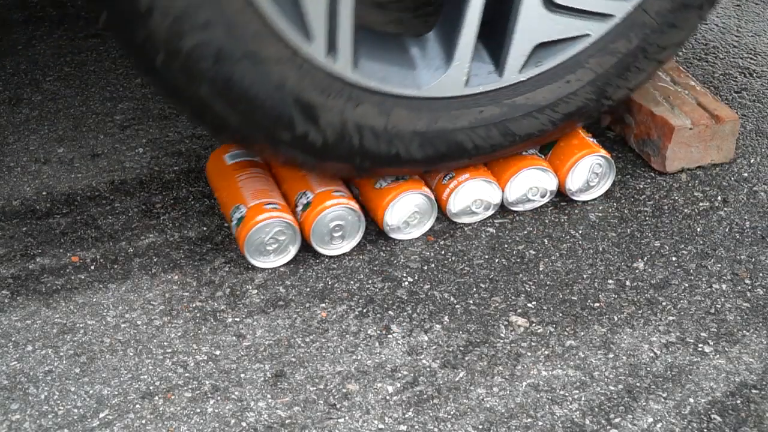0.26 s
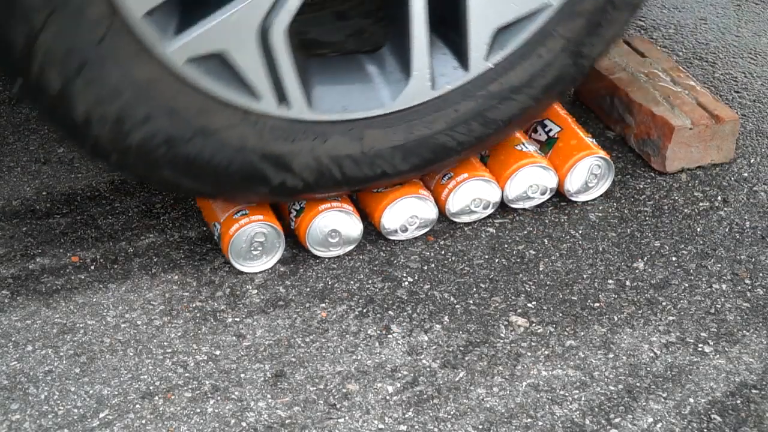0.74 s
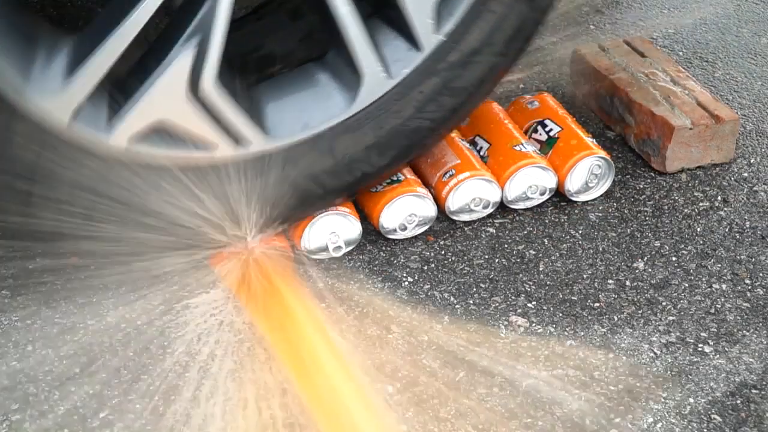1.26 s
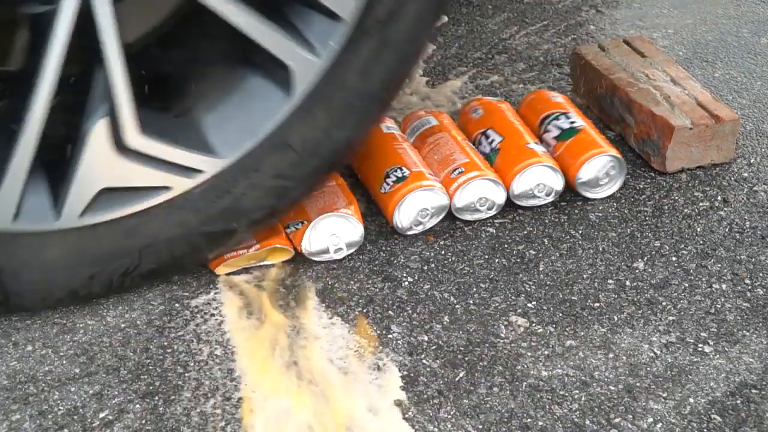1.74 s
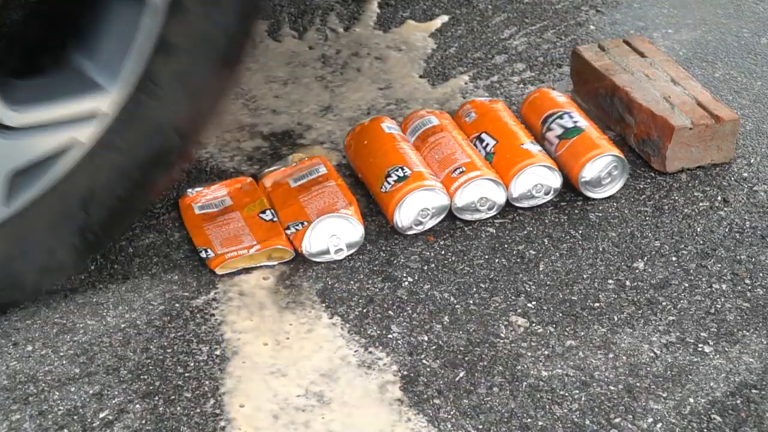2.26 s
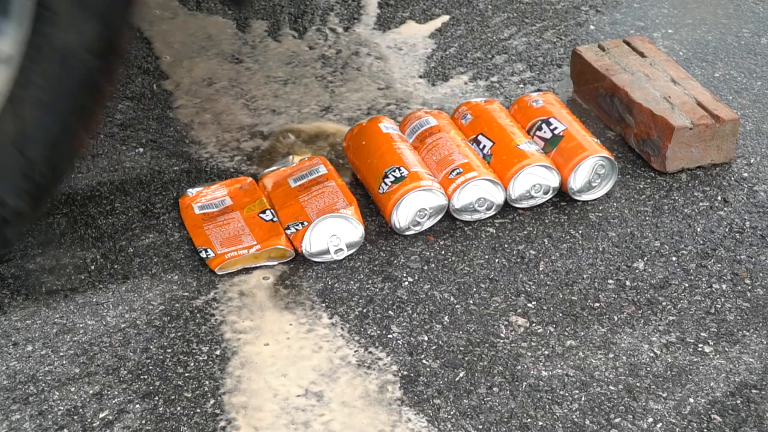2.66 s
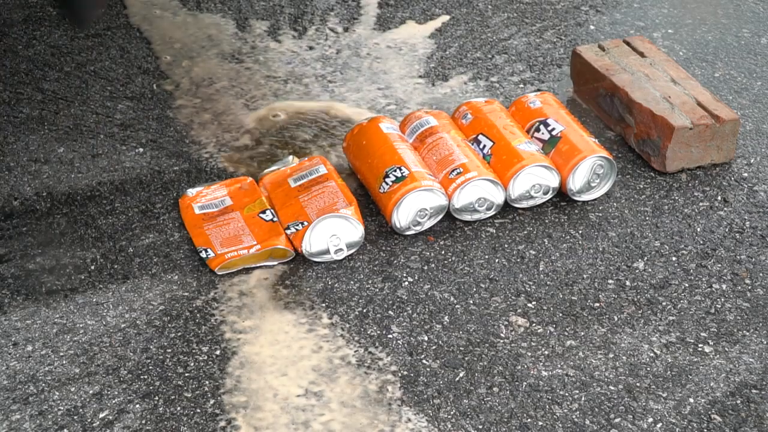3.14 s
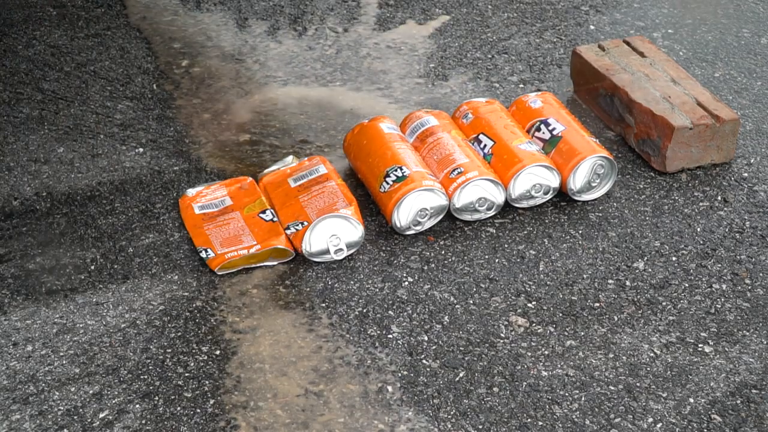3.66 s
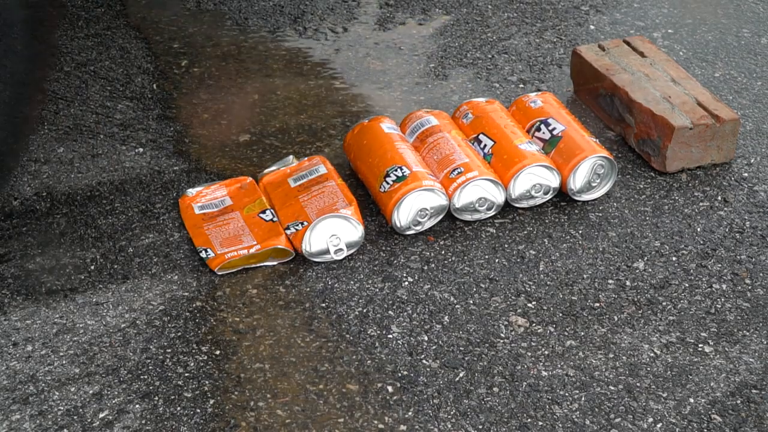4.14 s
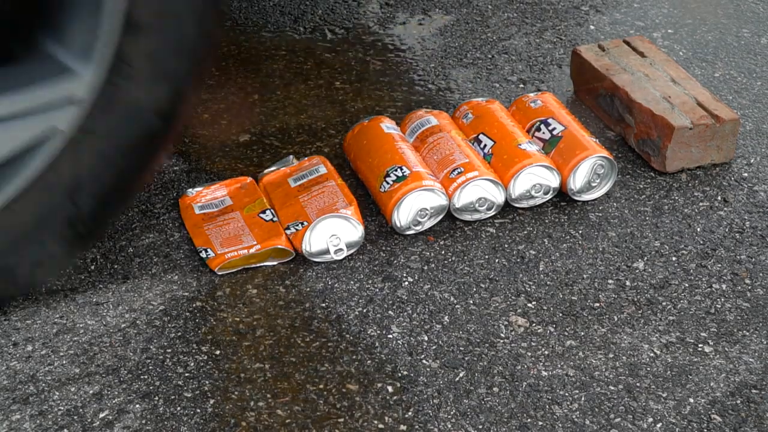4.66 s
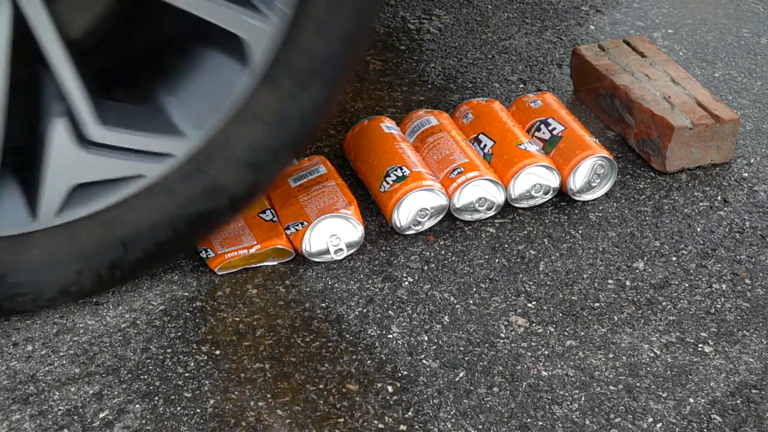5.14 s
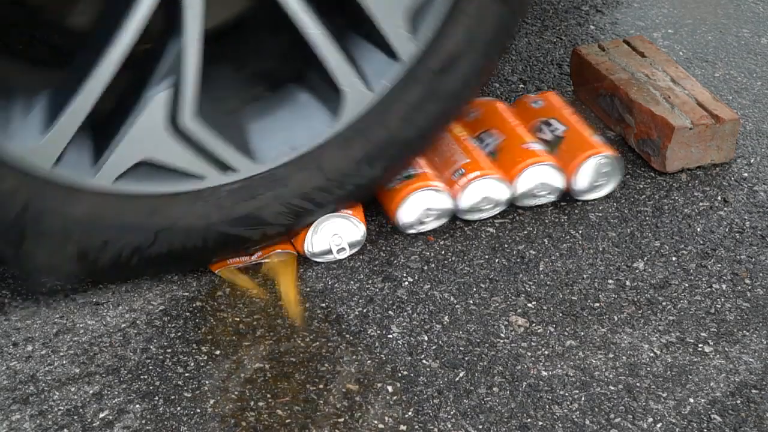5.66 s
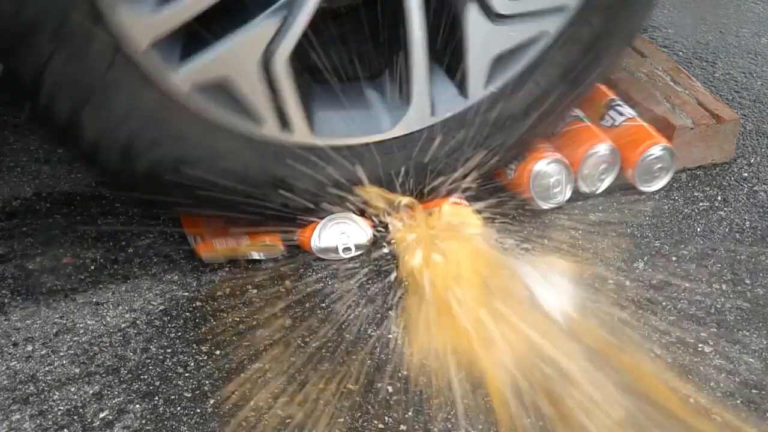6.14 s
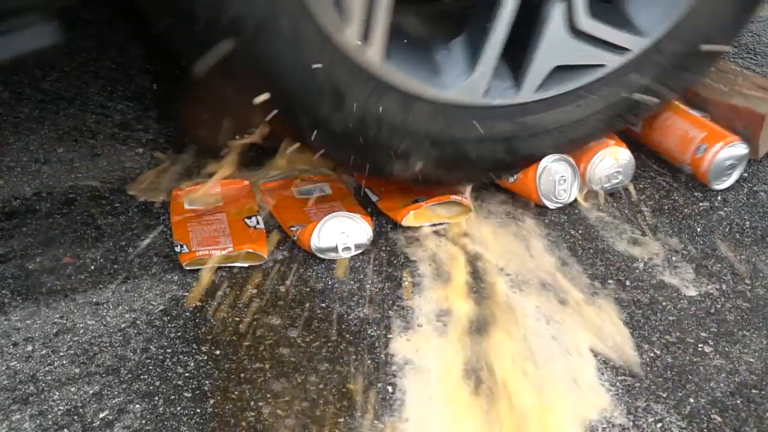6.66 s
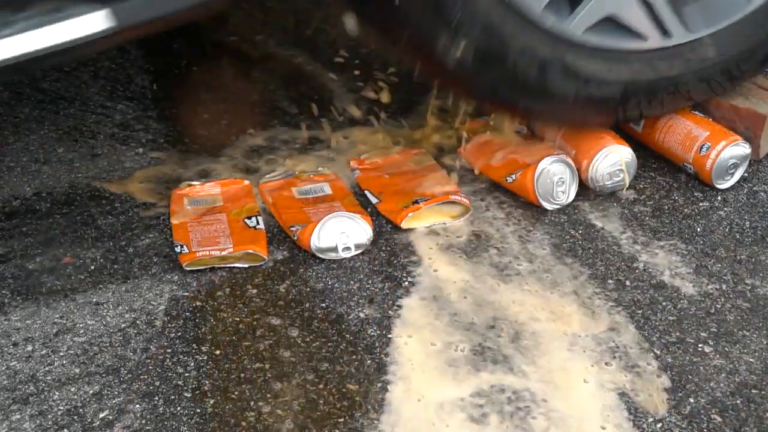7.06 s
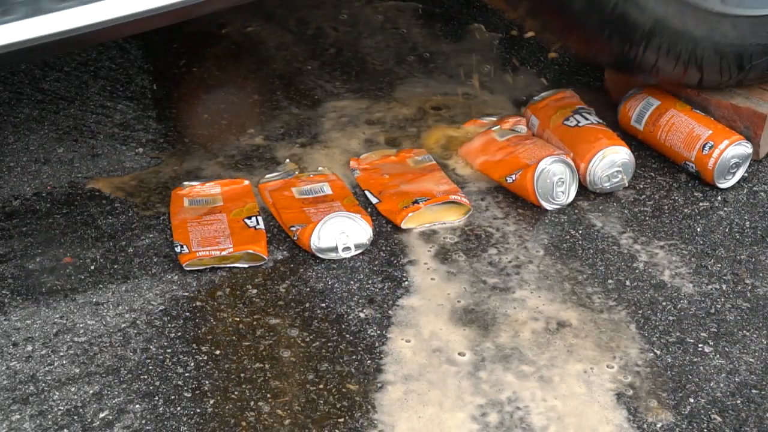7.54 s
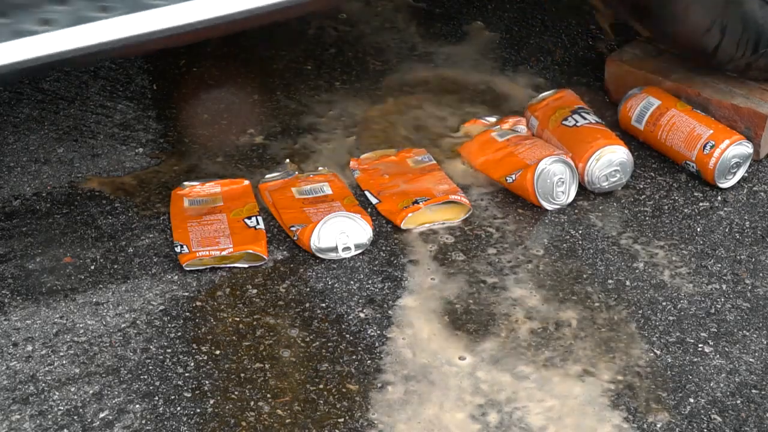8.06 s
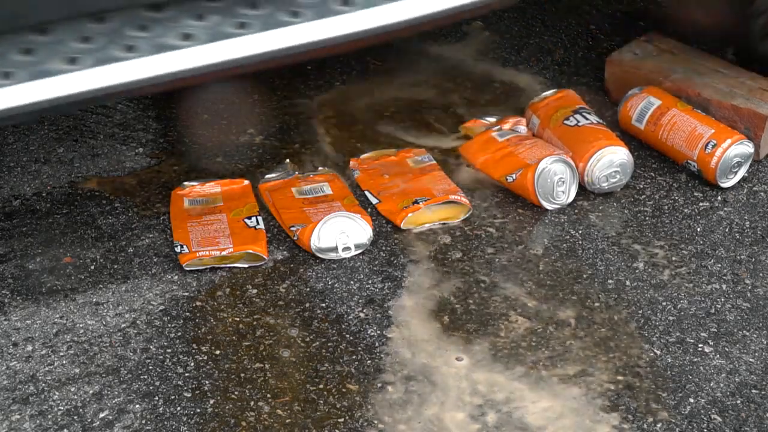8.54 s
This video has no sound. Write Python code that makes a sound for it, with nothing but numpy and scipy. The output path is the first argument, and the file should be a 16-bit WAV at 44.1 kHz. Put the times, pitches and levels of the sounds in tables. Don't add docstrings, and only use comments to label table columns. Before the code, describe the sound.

Microphones a step from the wheel in a yard with short echoes. Tight cans buckle in separate hollow thumps and sharp creases, burst and hiss; the crushed shells give isolated tinny pings with a quick slap off the car. A sudden cut brings louder engine chug, then thick continuous crunching and wet bursting, fading to fizz and jerky metal scrapes. The engine idles low, to the left.

```python
import sys
import numpy as np
from scipy import signal
from scipy.io import wavfile
from scipy.ndimage import uniform_filter1d, minimum_filter1d

SR = 44100
rng = np.random.default_rng(int(sys.argv[2]) if len(sys.argv) > 2 else 0)


def master(y):
    cut = np.clip(np.atleast_2d(y).T, -1, 1)
    pcm = np.round(cut * 32767)
    wavfile.write(sys.argv[1], SR, pcm.astype(np.int16))


def undo_db(level):
    steps = np.asarray(level, float) / 20
    return 10 ** steps


N = 388080
T = np.arange(N) / SR


def evened(x):
    return x / np.sqrt(np.mean(x ** 2) + 1e-20)


def peaked(x):
    return x / np.max(abs(x))


def read(points, hz):
    f, value = np.transpose(points)
    return np.interp(np.log(hz + 1), np.log(f + 1), value)


def curve(tables, index, rest=None):
    rows = np.vstack(tables)
    out = np.interp(T, rows[:, 0], rows[:, index])
    if rest is None:
        return out
    inside = sum((T >= table[0][0]) & (T <= table[-1][0]) for table in tables)
    return np.where(inside, out, rest)


def add(mix, s, sound, pan_db=0, lag=None):
    if lag is None:
        lag = .6 * pan_db
    for side, sign in enumerate((1, -1)):
        start = round(s * SR + max(-sign * lag, 0))
        part = mix[side, start:][:len(sound)]
        part += sound[:len(part)] * undo_db(sign * pan_db / 2)


def causal(points, size=2048):
    gain_db = read(points, abs(np.fft.fftfreq(size, 1 / SR)))
    log_gain = np.log(undo_db(np.maximum(gain_db, -90)))
    return np.fft.ifft(np.exp(np.conj(signal.hilbert(log_gain)))).real[:size // 2]


# f/Hz, likeness [-1 to 1]
LIKENESS = [(60, 1), (160, 0.62), (410, 0.31), (1090, 0.087), (2860, 0.51), (7510, -0.21)]


def noise(points, patchy_db, like):
    frames, hz = N // 256 + 5, np.fft.rfftfreq(1024, 1 / SR)
    a, b, c, d, patches = rng.standard_normal((frames, 513, 5)).T
    patches = uniform_filter1d(uniform_filter1d(patches, 10, 0), 10, 1)
    same = np.clip(like * read(LIKENESS, hz), -1, 1)[:, None]
    left = a + 1j * b
    right = same * left + np.sqrt(1 - same ** 2) * (c + 1j * d)
    z = np.array([left, right]) * undo_db(read(points, hz)[:, None] + patchy_db * evened(patches))
    return evened(signal.istft(z, nperseg=1024, noverlap=768)[1][:, :N])


def grains(points, per_s, spread_db, shared):
    draw = rng.random((3, N))
    size = undo_db(spread_db * np.minimum(rng.exponential(1, (3, N)), 4))
    clicks = size * np.sign(rng.standard_normal((3, N))) * (draw < per_s / SR)
    both = shared * clicks[2] + (1 - shared) * clicks[:2]
    return evened(signal.oaconvolve(both, causal(points)[None], axes=1)[:, :N])


def slips(seconds, count):
    t = np.arange(count) / SR / max(seconds, 2e-4)
    shape = (1 + np.exp(-8 * t)) * (np.exp(-t ** 2) + .1 * np.exp(-t / 3))
    return shape * rng.standard_normal(count) * undo_db(4.5 * rng.standard_normal(count))


def ring(modes, count):
    t = np.arange(count) / SR
    return sum(undo_db(db - 60 * t / max(t60, .004)) * np.sin(2 * np.pi * hz * t) for hz, db, t60 in modes)


# t/s, left-right level/dB
TYRE_SIDE = [(0, 1), (1.1, 1.5), (1.2, 4), (1.49, 2.5), (1.6, 1), (5.47, 3), (6.05, 1), (6.4, -3),
             (7.0, -0.5), (7.45, 14), (8.1, 4.5), (8.8, 13)]


def side_db(s):
    return np.interp(s, *np.transpose(TYRE_SIDE))


# t/s, peak level/dB, centre f/Hz, buckling time [s]
WALL_DENTS = [(0.1377, -4.5, 420, 0.022), (0.410, -15, 171, 0.013), (0.4185, -5, 430, 0.014),
              (0.545, -5, 407, 0.01), (0.556, -14.5, 88, 0.024), (0.95, -12, 88, 0.019),
              (0.762, -4.5, 540, 0.0042), (0.941, -7.5, 450, 0.011), (1.087, -12, 151, 0.0091),
              (1.097, -6.5, 149, 0.0014), (1.197, -9.5, 400, 0.0016), (1.209, -2.5, 513, 0.0054),
              (1.325, -9, 490, 0.0022), (1.356, -9, 225, 0.0067), (1.484, -14.5, 450, 0.006),
              (1.522, -17.5, 605, 0.006), (1.805, -22, 800, 0.011), (1.682, -13, 300, 0.03),
              (5.4745, -11.5, 230, 0.0046), (5.494, -12.5, 514, 0.008), (5.52, -11.5, 566, 0.031),
                (5.564, -13.5, 224, 0.0098), (5.586, -10.5, 700, 0.014), (5.601, -5, 770, 0.01),
                (5.629, -18, 693, 0.0098), (5.6515, -4, 650, 0.0029), (5.697, -11.5, 450, 0.021),
                (5.733, -15, 550, 0.011), (5.801, -11, 404, 0.0064), (5.843, -5, 470, 0.0082),
                (5.962, -11, 223, 0.0043), (6, -7, 300, 0.005), (6.009, -9, 504, 0.012),
                (6.03, -9.5, 660, 0.012), (6.152, -11, 270, 0.021), (6.186, -13, 454, 0.0032),
                (6.237, -9.5, 677, 0.0034), (6.264, -6, 255, 0.0028), (6.28, -16, 400, 0.012),
                (6.421, -13, 181, 0.056), (6.527, -8, 600, 0.015), (6.565, -9, 244, 0.0035),
                (6.616, -7, 215, 0.0085), (6.632, -11, 210, 0.0091), (6.659, -9, 218, 0.0039),
                (6.701, -6.5, 251, 0.0098), (6.869, -13.5, 330, 0.03), (6.755, -17.5, 292, 0.018),
                (6.911, -9.5, 325, 0.02), (7.0, -22.5, 248, 0.031), (7.257, -27, 684, 0.0037),
                (7.471, -31, 450, 0.014), (7.558, -29, 330, 0.0033), (7.634, -18, 470, 0.0013),
                (7.647, -23, 550, 0.0035), (7.656, -25.5, 800, 0.0072), (7.964, -27.5, 724, 0.0066),
                (8.074, -17, 316, 0.0051), (8.447, -20, 540, 0.0015), (8.461, -21, 620, 0.0033),
                (8.683, -30, 476, 0.0022)]
# t/s, peak level/dB, centre f/Hz, buckling time [s]
ECHOLESS_DENTS = [(0.139, -10.5, 780, 0.024), (0.424, -13, 200, 0.032), (0.428, -13.5, 820, 0.022),
                  (0.551, -12, 900, 0.008), (1.097, -18, 900, 0.0093), (5.476, -9, 200, 0.0076),
                  (5.495, -12.5, 300, 0.012), (6.873, -15, 250, 0.035), (6.915, -11.5, 550, 0.0096),
                  (6.95, -18, 242, 0.047), (8.075, -21, 310, 0.012)]
# f/Hz, level/dB
WALL_WEIGHT = [(60, -11), (90, 2.5), (200, -1), (1000, 5.5), (2500, -37.5)]


def dents(rows):
    out = np.zeros((2, N))
    for s, db, centre_hz, seconds in rows:
        hz = np.geomspace(70, 2500, num=50) * rng.uniform(0.912, 1.074, size=50)
        near_db = 15.0 * np.exp(-(np.log(hz / centre_hz) / 0.62) ** 2)
        mode_db = read(WALL_WEIGHT, hz) + near_db + 3 * rng.standard_normal(size=50)
        t60 = .023 * (400 / hz) ** .6 * rng.uniform(.7, 1.3, size=50)
        sign = rng.choice([-1, 1], size=50)
        body = ring(zip(sign * hz, mode_db, t60), count=9000)
        blow = signal.oaconvolve(slips(seconds, count=4000), body)
        add(out, s, undo_db(db) * peaked(blow), side_db(s))
    return out


# t/s, peak level/dB, push time [s]
PUSHES = [
    (0.4072, -9, 0.00054),
    (0.762, -0.5, 0.00037),
    (1.196, -4, 0.00043),
    (1.2087, 5.5, 0.00026),
    (1.3608, -8, 0.00082),
    (5.6523, -7, 0.00022),
    (6.029, -4, 0.00018),
    (6.0919, 21, 0.00063),
    (8.7996, -15, 0.00013),
]


def pops():
    out = np.zeros((2, N))
    for s, db, seconds in PUSHES:
        u = np.arange(2000) / SR / seconds
        rough = .05 * rng.standard_normal(len(u))
        push = u ** 2 * (2.6 - u + rough) * np.exp(-u)
        add(out, s, undo_db(db) * peaked(push))
    return out


# t/s, peak level/dB, tearing time [s], strongest f/Hz
DRY_CRACKS = [(0.06, -20, 0.023, 5060), (0.109, -24.5, 0.014, 5100), (0.138, -10, 0.016, 1210),
              (0.3187, -27.5, 0.009, 4020), (0.3447, -21, 0.02, 3500), (0.38, -21, 0.01, 3500),
              (0.4095, -15.5, 0.02, 1540), (0.4204, -8.5, 0.0074, 3000), (0.4707, -30, 0.015, 4000),
              (0.539, -18.5, 0.011, 3560), (0.548, -6, 0.0092, 1020), (0.7624, -8, 0.022, 1390),
              (0.9327, -14, 0.009, 3960), (0.944, -10.5, 0.0098, 1190), (1.0855, -18.5, 0.0068, 2520),
              (1.095, -22, 0.011, 1180), (1.1408, -31.5, 0.01, 3960), (1.2094, -6, 0.0084, 2590),
              (1.301, -20, 0.0087, 4600), (1.355, -5.5, 0.006, 1700), (1.373, -13, 0.036, 3500),
              (1.3912, -10.5, 0.0086, 2940), (1.4, -22, 0.006, 2300), (1.415, -17, 0.019, 905),
              (1.45, -15.5, 0.012, 905), (1.3254, -16, 0.0037, 1480), (1.4835, -16, 0.0034, 1280),
              (1.044, -33, 0.0065, 4040), (0.241, -37.5, 0.0046, 4000), (1.677, -16.5, 0.017, 2040),
              (1.5207, -20.5, 0.0086, 890), (1.6412, -26, 0.0022, 4100), (1.836, -18.5, 0.011, 805)]
# t/s, peak level/dB, tearing time [s], strongest f/Hz
SECOND_CRACKS = [(5.4746, -19.5, 0.0064, 2200), (5.521, -23, 0.015, 1500), (5.564, -27, 0.005, 4000),
                 (5.588, -18.5, 0.0088, 2800), (5.608, -14.5, 0.02, 1500), (5.636, -24, 0.008, 3500),
                 (5.6504, -26.5, 0.008, 2960), (5.698, -25.5, 0.012, 2470), (5.732, -9.5, 0.0069, 2570),
                 (5.753, -21, 0.0047, 4500), (5.7716, -18, 0.01, 2020), (5.8042, -11.5, 0.007, 4100),
                 (5.815, -12, 0.009, 3460), (5.8415, -15.5, 0.006, 2460), (5.8744, -19, 0.006, 1500),
                 (5.919, -23, 0.02, 2680), (5.9632, -7, 0.008, 1900), (5.988, -18, 0.008, 2500),
                 (6.0076, -16.5, 0.006, 1100), (6.017, -8.5, 0.0054, 2010), (6.030, -10, 0.011, 2200),
                 (6.0934, 3.5, 0.003, 3030), (6.1133, -29.5, 0.008, 3470), (6.1436, -12, 0.04, 1500),
                 (6.227, -29.5, 0.004, 2020), (6.2387, -12.5, 0.003, 2800), (6.267, -7.5, 0.008, 2480),
                 (6.273, -8, 0.018, 1740), (6.3235, -14.5, 0.015, 2000), (6.3478, -14, 0.015, 1200),
                 (6.3853, -15.5, 0.008, 1820), (6.4228, -11.5, 0.03, 2500), (6.482, -25, 0.003, 3050),
                 (6.519, -8.5, 0.012, 2160), (6.567, -6.5, 0.011, 1210), (6.623, -15, 0.006, 1500),
                 (6.634, -12.5, 0.004, 2700), (6.76, -22, 0.02, 2550), (6.8065, -17.5, 0.022, 3570),
                 (6.859, -15, 0.016, 2530), (6.87, -27, 0.008, 1500), (6.912, -20, 0.0064, 2220),
                 (6.9946, -20, 0.006, 1080), (7.004, -25, 0.003, 3000), (7.546, -21, 0.012, 2000),
                 (8.148, -16.5, 0.0054, 700)]
# f/Hz, level/dB per Hz
CREASE_TONE = [(410, -7.5), (700, -9), (1490, -10.5), (5300, -7), (7050, -11.5), (7960, -16),
               (10300, -55.5), (17500, -120)]
# tilt at full force [dB per octave], tilt gained per dB softer, loss about the
# strongest pitch [dB per octave squared], left-right level/dB
CREASE_RULES = [
    (0.5, -0.16, 2, -0.2),
    (-3, -0.1, 3.5, -0.35),
]


def cracks():
    out = np.zeros((2, N))
    for rows, (tilt_db, per_db, hump_db, pan_db) in zip((DRY_CRACKS, SECOND_CRACKS), CREASE_RULES):
        for s, db, seconds, top_hz in rows:
            tilt = tilt_db - per_db * db
            colour = causal([(hz, v + tilt * np.log2(hz / 2500) - hump_db * np.log2(hz / top_hz) ** 2)
                             for hz, v in CREASE_TONE])
            modes = [(hz, 0, .014) for hz in top_hz * np.exp(.35 * rng.standard_normal(size=6))]
            tear = signal.oaconvolve(slips(seconds, count=4000), colour)[:4500]
            after = signal.oaconvolve(tear, ring(modes, count=1200))[:4500]
            sound = peaked(tear) + 0.44 * peaked(after)
            add(out, s, undo_db(db) * peaked(sound), pan_db + side_db(s))
    return out


def ping(can, share, seconds, top_hz, narrow_db=0):
    shift, jolt = rng.standard_normal((2, 14))[:, :len(can)]
    hz, mode_db, t60 = np.transpose(can)
    tear, share = slips(seconds, count=2000), np.clip(share, 0, 1)
    near_db = (8 + narrow_db) * np.exp(-(np.log(hz / top_hz) / .3) ** 2)
    bent_hz = hz * (1 + seconds * shift)
    modes = zip(bent_hz, mode_db + near_db + 2 * jolt, .65 * t60)
    tick = causal([(.12 * top_hz, -25), (.5 * top_hz, -4 - narrow_db), (top_hz, 0),
                   (1.28 * top_hz, -1 - .8 * narrow_db),
                   (max(6500, 1.3 * top_hz), -11 - 1.6 * narrow_db),
                   (12000, -20 - 1.6 * narrow_db)])
    tick = np.pad(tick, (0, 9000 - len(tick)))
    shell = peaked(signal.oaconvolve(tear, ring(modes, count=9000)))
    return peaked(share * shell + (1 - share) * peaked(signal.oaconvolve(tear, tick)))


# t/s, peak level/dB, slap level/dB, ring share [0-1], strongest f/Hz
SPRING_BACKS = [
    [(1.786, -8.5, -35, 0.5, 1290), (1.953, -8, -9.5, 0.36, 1100), (2.68, -27, -22.5, 0, 2100),
     (2.859, -6, -7.5, 0.23, 890), (3.035, -13.5, -14.5, 0.41, 845), (3.218, -22, -34, 0, 6000),
     (3.401, -27, -44, 0.26, 1350)],
    [(2.391, -9.5, -7.5, 0.62, 2500), (2.430, -24, -40, 1, 2450)],
    [(2.521, -14.5, -15.5, 0.53, 3180), (2.567, -8, -8.5, 0.49, 2430)],
    [(3.756, -14.5, -13, 0.33, 1210)],
]
# f/Hz, level/dB, t60 [s]
CAN_MODES = [
    [(850, 0, .03), (1130, 1, .06), (1744, -8, .03), (2430, -2, .05), (3130, -5, .05), (3900, -8, .03),
     (4650, -8, .025)],
    [(850, -10, .04), (1104, -5, .07), (1690, -4, .05), (2430, -7, .19), (2450, 0, .035), (2472, -7, .19),
     (3144, -7, .05), (3451, -7, .04), (4657, 3, .018), (5283, 3, .02), (6000, 2, .015), (6900, 2, .015)],
    [(830, -4, .05), (1730, -1, .11), (2433, 0, .05), (2546, -4, .09), (2900, -6, .03), (3499, 0, .06),
     (4150, -5, .03), (4813, -1, .025), (5453, -1, .04)],
    [(900, -8, .04), (1150, -4, .05), (1809, 0, .06), (2299, -7, .04), (3628, -9, .035), (4640, -9, .035)],
]
# rattle time [s], left-right level/dB of the ping, of its slap, slap pitch over ping pitch
CAN_STRIKES = [
    (0.002, -3.5, 2.5, 1.2),
    (0.004, -3, 2, 1),
    (0.004, -2.5, 1.5, 1),
    (0.003, -4, 5, 1.5),
]
# t/s, peak level/dB, strongest f/Hz, rattle time [s], left-right level/dB
JERKS = [(6.6824, -11.5, 4200, 0.0017, -8), (7.651, -18, 2300, .0015, -11),
         (7.655, -13.5, 2550, 0.0084, -1), (7.6555, -9.5, 4540, 0.0093, -20), (7.669, -11, 1820, 0.017, 4),
         (7.669, -11, 4100, 0.011, -1), (7.682, -12, 4000, 0.016, 3), (7.702, -14, 1000, 0.0037, -15),
         (7.706, -17, 4250, 0.0039, -9), (7.7193, -7.5, 1700, 0.007, 6.5), (7.729, -13.5, 2600, 0.0075, -1),
         (8.2015, -12, 2600, 0.011, -10), (8.2176, -6.5, 1930, .01, 6), (8.217, -10, 5500, 0.0053, -10),
         (8.227, -9.5, 2600, 0.013, -4), (8.2433, -19.5, 1000, 0.006, -10), (8.2603, -6.5, 1920, 0.0027, 6),
         (8.270, -19, 1110, 0.0078, -16), (8.2852, -12, 1940, 0.0038, 12), (8.290, -16, 3300, 0.016, -10),
         (8.296, -16, 6060, 0.033, -14.5), (8.3095, -11, 2040, 0.0028, 8), (8.315, -6.5, 2900, 0.014, -3),
         (8.313, -8, 4200, 0.0061, 10), (8.322, -15, 2480, 0.016, 10), (8.339, -23, 3470, 0.027, -1)]
# f/Hz, level/dB, t60 [s]
TORN_MODES = [(890, -3, .03), (1200, -6, .025), (1620, -5, .03), (1890, -2, .032), (2130, -5, .03),
              (2440, -2, .045), (2620, -3, .04), (2870, -3, .04), (3380, -5, .03), (3810, -3, .04),
              (4090, -4, .035), (4380, -4, .03), (5620, -7, .02), (6180, -7, .02)]


def pings():
    slap_s, spacing = .0153, 3
    out = np.zeros((2, N))
    for can, rows, (seconds, pan_db, slap_pan_db, lift) in zip(CAN_MODES, SPRING_BACKS, CAN_STRIKES):
        for s, db, slap_db, share, top_hz in rows:
            direct = ping(can, share, seconds, top_hz)
            slap = ping(can, share, seconds, lift * top_hz)
            add(out, s, undo_db(db) * direct, pan_db, -spacing)
            add(out, s + slap_s, undo_db(slap_db) * slap, slap_pan_db, spacing)
    for s, db, top_hz, seconds, pan_db in JERKS:
        scrape = ping(TORN_MODES, 0.4, seconds, top_hz, narrow_db=6.5)
        add(out, s, undo_db(db) * scrape, pan_db, spacing * np.sign(pan_db))
    return out


# t/s, level/dB
GRINDING = [
    [(0, -41), (1.18, -42), (1.24, -34), (1.45, -21.5), (1.6, -36.5), (1.72, -30), (2.0, -42)],
    [(5.46, -34.5), (5.78, -30), (5.9, -28.5), (6.2, -23.5), (6.5, -23.5), (6.75, -36), (6.82, -35),
     (6.95, -33), (7.15, -56)],
    [(7.42, -55), (7.5, -31.5), (7.65, -42)],
]
# f/Hz, level/dB per Hz
GRINDING_TONE = [(35, -50), (60, 0), (321, 0.5), (642, -3.5), (1850, -17), (6000, -30), (7800, -51),
                 (13200, -120)]


def crunch():
    rattles = rng.standard_normal((4, 1, 600)) * np.hanning(600)
    buckles = 0
    for rattle in rattles:
        clicks = grains(GRINDING_TONE, 110, 3.9, 0.82)
        buckles = buckles + signal.oaconvolve(clicks, rattle, axes=1)[:, :N]
    level_db = uniform_filter1d(curve(GRINDING, index=1, rest=-99.0), size=300)
    return undo_db(level_db) * evened(buckles)


# t/s, level/dB
SPRAY = [
    [(0, -52), (1.19, -56.5), (1.22, -35), (1.34, -46), (1.45, -43), (1.58, -31), (1.7, -33.5),
     (2.15, -39.5), (3.94, -47.5)],
    [(5.4, -67), (5.93, -43), (6.07, -49), (6.11, -35.5), (6.5, -37), (6.8, -33), (7.17, -37),
     (7.55, -34.5), (8.8, -42.5)],
]
# f/Hz, level/dB per Hz
SPRAY_TONE = [(290, -40), (500, -8), (903, -6.5), (5190, -8.5), (6850, -14.5), (7960, -17), (10300, -60.5),
              (17500, -120)]


def foam():
    hiss = noise(SPRAY_TONE, patchy_db=1.5, like=0.99)
    bubbles = grains(SPRAY_TONE, 1300, 6.6, 0.75)
    level_db = uniform_filter1d(curve(SPRAY, index=1, rest=-69), 400)
    return undo_db(level_db) * evened(hiss + undo_db(-10.0) * bubbles)


# t/s, level/dB
THUD = [
    [(0, -46.5), (.6, -34), (.95, -42), (1.3, -38), (1.6, -27), (2.0, -35.5), (3.94, -29.5)],
    [(3.942, -17.5), (4.3, -18.5), (4.9, -21), (5.3, -25.5), (5.6, -38), (6.3, -28.5), (7.0, -38),
     (8.8, -51)],
]
# t/s, cycles per second
CYCLES = [(0, 10.9), (3.94, 10.9), (3.942, 12.9), (4.3, 12.1), (4.8, 11.2), (5.4, 10.5), (8.8, 10.4)]
# multiple of the cycle, level/dB
ORDERS = [(1, 2), (2, -2), (3, 1), (4, -10), (5, -15), (6, -16), (7, -17), (8, -13)]
# t/s, wash level/dB, whine level/dB
WASH_LEVEL = [
    [(0, -35, -87), (1.2, -40.5, -77), (2.0, -38.5, -71), (3.94, -35.5, -79)],
    [(3.942, -28, -55.5), (5.45, -30, -54), (5.75, -38, -66.5), (7.0, -35, -74), (8.8, -34.5, -67)],
]
# f/Hz, level/dB per Hz
WASH_COLOUR = [(20, -1), (140, -16.5), (550, -26.5), (1200, -32), (2500, -37.5), (4000, -44), (7000, -57.5),
               (8000, -71.5)]
# f/Hz, width [Hz], level over the wash/dB
RESONANCES = [
    (198.5, 18, -2.5),
    (1080, 270, -11.5),
    (1320, 52, -25),
]


def engine():
    turns = np.cumsum(curve([CYCLES], index=1)) / SR + .55
    thud = 0
    for k, db in ORDERS:
        waver = evened(signal.resample(rng.standard_normal(60), N))
        thud = thud + undo_db(db + waver) * np.cos(k * 2 * np.pi * turns + .2 * k * k + waver / 5)
    breath_db = 0.54 * np.cos(2 * 2 * np.pi * turns)
    wash = noise(WASH_COLOUR, patchy_db=2.5, like=1.0) * undo_db(breath_db)
    white = rng.standard_normal(N)
    for hz, width, db in RESONANCES:
        tone = signal.lfilter(*signal.iirpeak(hz, hz / width, SR), white)
        wash = wash + undo_db(db - 9.5) * evened(tone)
    whine = undo_db(curve(WASH_LEVEL, index=2) + 3.5) * np.sin(2 * np.pi * 7138 * T)
    thud = undo_db(curve(THUD, index=1)) * evened(thud)
    left, right = thud + undo_db(curve(WASH_LEVEL, index=1) + 2.0) * wash + whine
    return np.array([left, np.roll(right, 10)])


# f/Hz, t60 [s]
YARD_T60 = [(100, 0.61), (500, 0.3), (2000, 0.21), (7000, 0.13)]


def yard(x):
    taps = np.zeros((2, SR // 2))
    at = np.arange(200, SR // 2 - 20, 20)
    at = at + rng.integers(0, 20, (2, len(at)))
    np.put_along_axis(taps, at, rng.choice([-1., 1.], at.shape), 1)
    hz, t, z = signal.stft(taps, SR, nperseg=256)
    t60 = np.maximum(read(YARD_T60, hz), .02)[:, None]
    tail = signal.istft(z * undo_db(-60 * t / t60), SR, nperseg=256)[1]
    return signal.fftconvolve(x, tail / np.linalg.norm(tail[0]), axes=1)[:, :N]


def scene():
    low = dents(WALL_DENTS)
    high = cracks() + pings()
    boom = yard(low)
    echoes = undo_db(-11.5) * (boom + 0.77 * boom[::-1]) + undo_db(-9.5) * yard(high)
    metal = low + high + pops() + dents(ECHOLESS_DENTS)
    return metal + echoes + crunch() + foam() + engine()


def top_cut(x):
    return signal.sosfilt(signal.butter(12, 15600, fs=SR, output="sos"), x)


def record(dry):
    over_db = np.maximum(20 * np.log10(abs(dry).max(0) + 1e-9) + 3, 0)
    ahead = -minimum_filter1d(-over_db, size=440, origin=-160)
    fall = T * 2000.
    held_db = uniform_filter1d(np.maximum.accumulate(ahead + fall) - fall, size=60)
    edge = signal.firwin(161, 7500, window=("kaiser", 9), fs=SR)
    out = signal.oaconvolve(dry / undo_db(held_db), edge[None], "same", axes=1)
    since_s = T - 3.9409
    out = out - 0.12 * (since_s >= 0) * np.exp(-np.maximum(since_s, 0) / 0.0032)
    return top_cut(out)


dry = scene()
out = record(dry)
master(out)
```